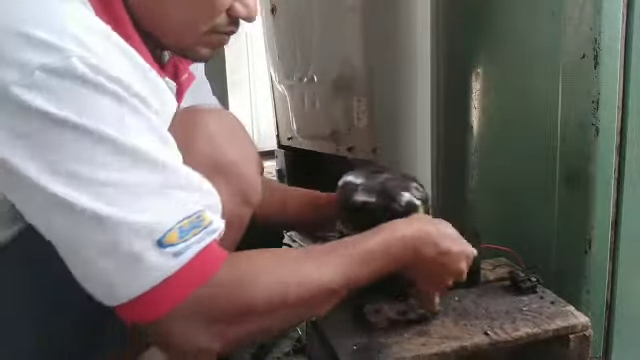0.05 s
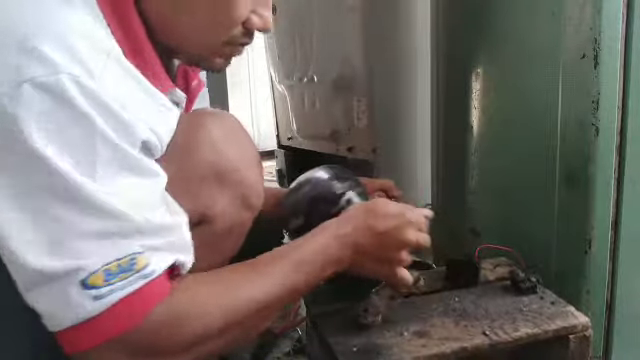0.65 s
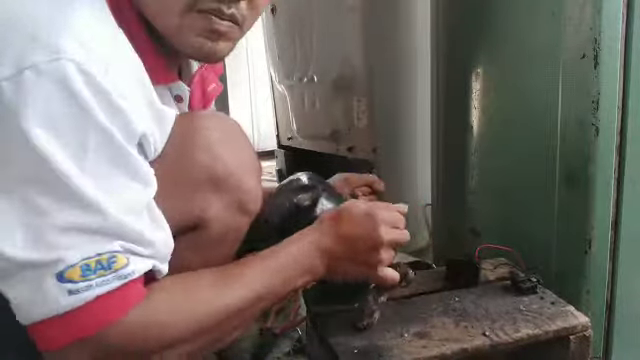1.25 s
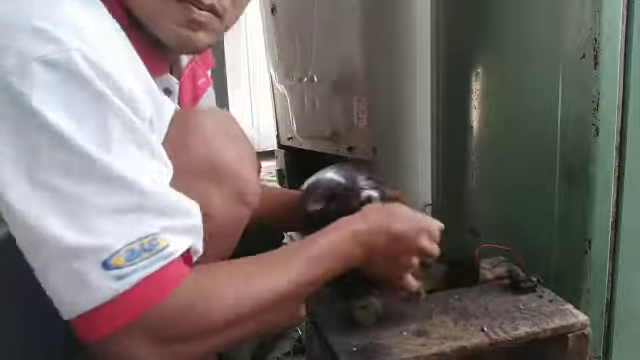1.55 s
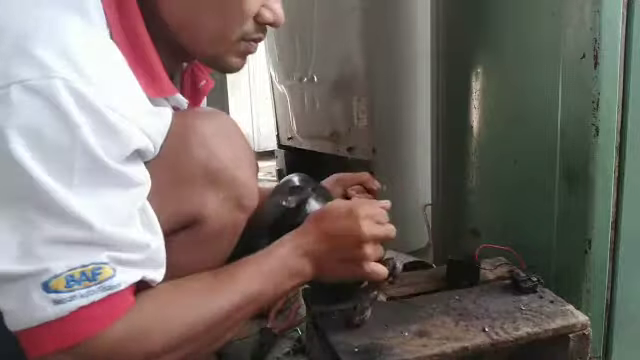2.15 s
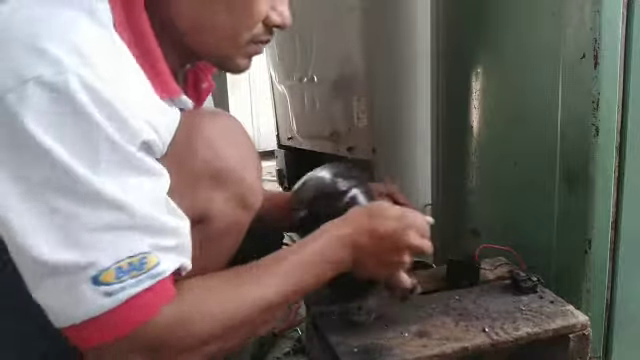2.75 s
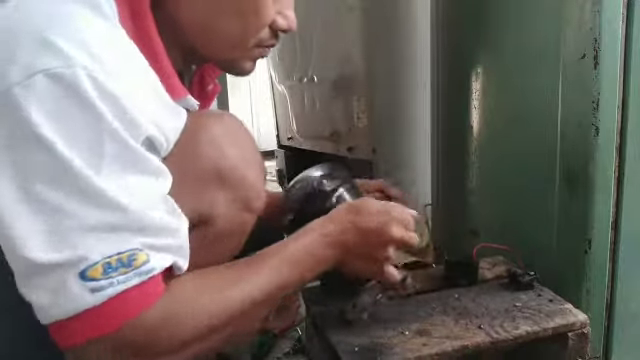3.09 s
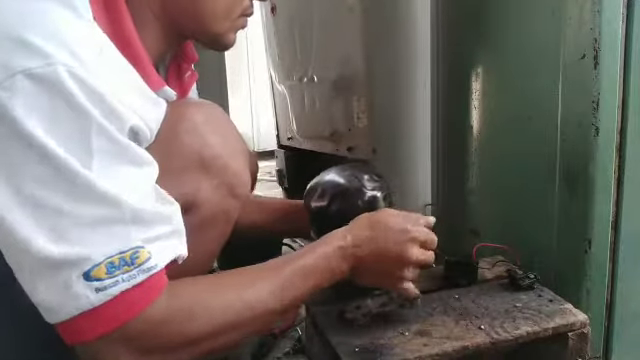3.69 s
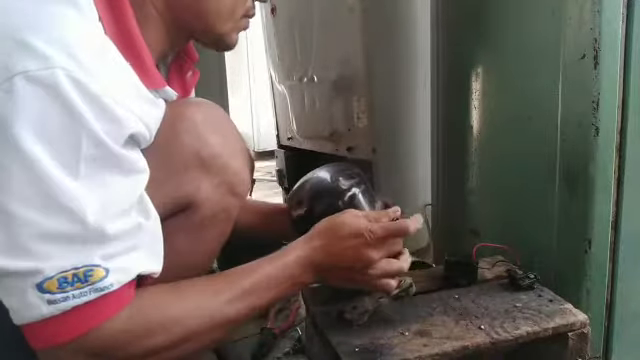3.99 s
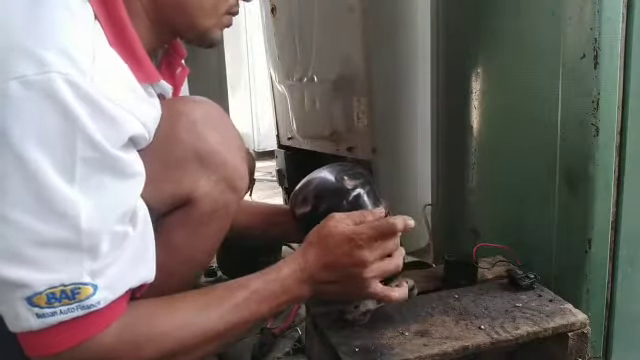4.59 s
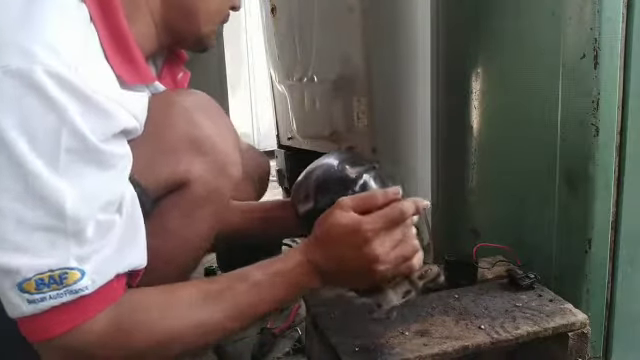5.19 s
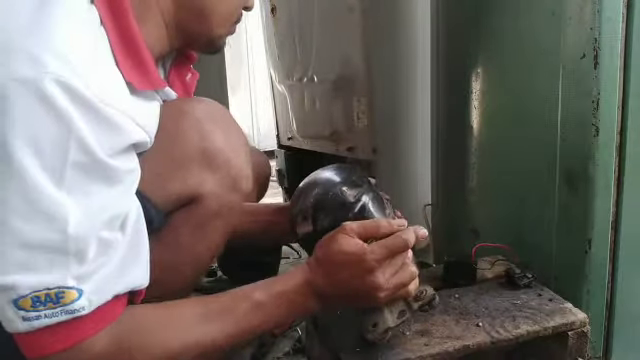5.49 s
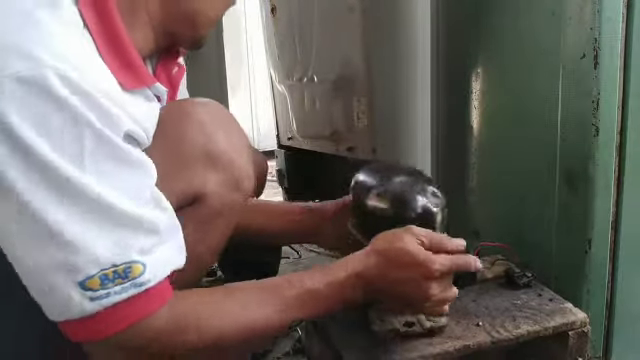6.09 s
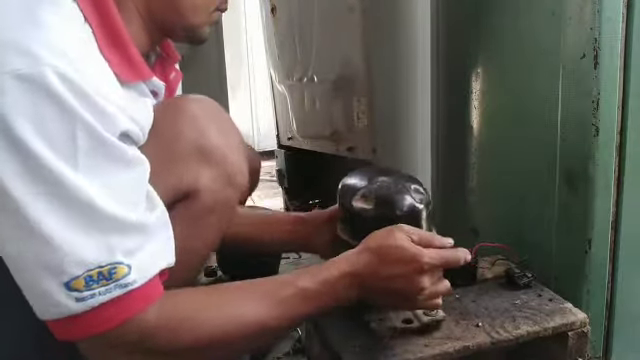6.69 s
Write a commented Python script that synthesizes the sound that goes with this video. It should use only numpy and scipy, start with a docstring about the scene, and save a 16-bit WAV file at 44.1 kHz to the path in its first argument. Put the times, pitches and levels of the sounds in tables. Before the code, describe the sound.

A sealed fridge compressor is shaken by hand over a wooden bench in a small workshop. The motor inside slams against the steel shell in quick, hard knocks with a brief rattling ring, and the base sometimes bumps the wood. Midway the knocking stops and oil sloshes softly inside, then the clanking resumes. The microphone is close, with faint room tone behind.

```python
"""Hard steel knocks, close to the microphone: a sealed fridge compressor is shaken by hand over a
wooden bench in a small workshop. At each swing the sprung motor inside slams into the shell and
chatters against it; the base bumps the bench. Midway the can is only tilted gently and the oil is
heard sloshing alone, then the shaking resumes. Faint room tone and a high whine lie behind it all."""
import sys
import numpy as np
from scipy import signal
from scipy.fft import rfft, irfft, next_fast_len
from scipy.io import wavfile

SR = 44100
rng = np.random.default_rng(int(sys.argv[2]) if len(sys.argv) > 2 else 0)


def master_out(mix):
    """Clip the mix to full scale and print it as 16-bit PCM to the path in sys.argv[1]."""
    frames = np.transpose(np.atleast_2d(mix))
    ceiling = np.clip(frames, -1, 1)
    pcm = np.round(ceiling * 32767).astype(np.int16)
    wavfile.write(sys.argv[1], SR, pcm)


N = 302085
TAIL = 16384   # samples in one ringing sound

# Levels in the tables are relative: each layer adds its own gain.
# steady air of the workshop: (frequency [Hz], density [dB])
AIR_SPECTRUM = [(30, 2), (50, 7), (75, 3), (100, 6.5), (250, -7.5), (800, -13), (2000, -19.5), (4000, -25),
                (5200, -31.5), (6400, -16), (7400, -8.5), (8200, -16.5), (9200, -28), (12500, -26.5),
                (15700, -16)]
# oil washing around in the can: (time [s], level [dB])
OIL_WASH = [(0.0, -44), (1.49, -51), (1.58, -44), (1.72, -59), (1.95, -50), (2.04, -40), (2.86, -70),
            (3.03, -43), (3.2, -45), (3.47, -54.5), (4.54, -47), (5.28, -54), (5.99, -45), (6.37, -63),
            (6.58, -70.5), (6.85, -77)]
# oil slapping the wall as the can tips: (time [s], level [dB], half length [s], spray level [dB])
OIL_SLAPS = [(0.443, -44.5, 0.098, -54.5), (2.373, -43, 0.032, -58), (2.801, -45, 0.033, -66),
             (3.594, -46.5, 0.015, -70), (3.765, -51.5, 0.022, -58), (3.935, -42.5, 0.023, -48.5),
             (4.06, -58.5, 0.073, -57.5), (4.242, -44, 0.014, -48.5), (4.294, -42.5, 0.034, -58),
             (4.398, -44.5, 0.02, -64), (4.548, -49.5, .019, -56), (4.602, -43.5, 0.0097, -49.5),
             (4.644, -44.5, 0.021, -53), (4.937, -42, 0.016, -54), (5.002, -48, 0.027, -62),
             (5.44, -43, 0.043, -63), (6.463, -42.5, 0.015, -75)]
# splashing oil: (frequency [Hz], density [dB])
SLOSH_SPECTRUM = [(250, -13.5), (450, 0.5), (600, -5.5), (780, 3), (950, -5), (1200, -3), (1550, -0.5),
                  (2000, -7), (3200, -9.5), (4500, -17), (6500, -13.5), (9000, -22.5), (13000, -29),
                  (15500, -18)]
# fine oil spray: (frequency [Hz], density [dB])
SPRAY_SPECTRUM = [(4000, -9), (7000, 9), (9500, -4), (15500, 9)]
# air space above the oil: (frequency [Hz], width [Hz], level [dB])
CAVITY_MODES = [(755, 51, 6), (1104, 13.6, -3.5), (1208, 43, 0.5), (1542, 52, -3)]
# large bubbles in the oil: (time [s], starting pitch [Hz], level [dB])
BUBBLES = [(0.135, 486, -37), (0.285, 2060, -43), (0.315, 1111, -35.5), (0.385, 784, -44.5),
           (2.315, 865, -41), (3.900, 783, -52), (4.125, 752, -49), (4.210, 755, -48)]
# boards shuddering under the heavy can: (frequency [Hz], density [dB])
BOARD_SPECTRUM = [(18, 0.5), (30, 1), (42, -2), (57, 5.5), (73, -23), (95, -6), (120, -10.5), (150, 0.5),
                  (220, -37)]
# the wooden bench: (frequency [Hz], width [Hz], level [dB])
BENCH_MODES = [(155.4, 28.7, 1), (195, 71, 0.5), (314, 107, 3.5), (454, 77, 0.5), (605, 150, -3),
               (842, 47, -3.5), (1406, 320, 8.5), (1990, 1300, 6)]
# the base landing on the bench between swings: (time [s], peak level [dB], contact sharpness [Hz])
BASE_BUMPS = [(0.302, -34, 264), (0.489, -29.5, 246), (1.602, -19, 456), (2.009, -13, 3000),
              (2.856, -24.5, 350), (2.976, -27, 220), (3.053, -20.5, 520), (5.036, -36, 257),
              (5.417, -22.5, 1180), (5.849, -29.5, 237), (6.054, -19.5, 483), (6.234, -30, 220)]
# crowded modes of the motor: (frequency [Hz], density [dB])
MOTOR_SPECTRUM = [(110, -41), (150, -2.5), (215, -5), (320, 2.5), (400, -6.5), (500, 4), (600, -0.5),
                  (780, 4.5), (930, -3), (1100, -10), (1340, -4.5), (1500, -6), (2000, -15.5),
                  (2600, -20.5)]
# crowded modes of the shell wall: (frequency [Hz], density [dB])
WALL_SPECTRUM = [(2000, -41), (2300, -12), (2500, -3.5), (2700, -1.5), (2830, 6.5), (3050, -7.5),
                 (3400, -10), (3800, -11.5), (4080, 1), (4350, -16.5), (4700, -17)]
# bright clash at the point of contact: (frequency [Hz], density [dB])
CLASH_SPECTRUM = [(4300, -59), (4900, -18.5), (5400, -6), (5950, -9), (6500, 3.5), (7400, -2.5), (8000, -5),
                  (8700, -18.5), (9350, -17), (10800, -21), (13000, -17), (13900, -12), (15700, -16)]
# the motor on its springs: (frequency [Hz], level [dB], t60 [s])
SPRING_MODES = [(695.9, -5, 0.23), (813, -1, 0.17), (957, -5, 0.16), (1126, 3, 0.15), (1253, 1, .14),
                (1350, -12, 0.38)]
# lasting modes of the steel shell: (frequency [Hz], level [dB], t60 [s])
SHELL_MODES = [(2630, -11.5, 0.066), (2750, -8.5, 0.12), (2840, -3, 0.14), (2850, -5.5, 0.16),
               (3050, -10.5, 0.16), (3250, -11.5, 0.25), (3670, -13.5, .11), (3990, -10.5, 0.093),
               (4130, -8.5, 0.072), (6420, -4.5, 0.13), (6460, -14.5, 0.11), (9300, -15.5, 0.1),
               (11450, -20, 0.15), (12600, -23, .12), (13950, -11, .12)]
# the motor hits the shell, flies back and strikes again: (time [s], level [dB], hardness [0-1],
# flight [s], second level [dB], second hardness [0-1], loss per bounce [dB])
SLAMS = [(0.036, -13, 0.89, 0.028, -16, 0.75, 3.5), (0.239, -24, 0, .011, -19.5, 0.42, 4),
         (0.505, -12.5, .85, .023, -10.5, 0.8, 8), (0.712, -18, 0.36, 0.015, -17.5, 0.46, 7.5),
         (0.97, -12.5, 0.91, 0.024, -13.5, 0.88, 3), (1.171, -16.5, 0.46, .014, -18, 0.78, 10),
         (1.427, -11.5, 0.87, 0.028, -23.5, 0.76, -0.5), (1.565, -28, 0.26, 0.02, -45, 0.1, 13),
         (1.646, -19.5, 0, 0.0089, -18, 0.61, 5.5), (1.912, -14, 0.77, 0.028, -17.5, 0.66, 3),
         (2.128, -21, 0.3, 0.015, -22.5, 0.64, 5.5), (2.4, -13.5, 0.82, 0.025, -15.5, 0.89, 4),
         (2.601, -26.5, 0.44, 0.012, -23, 0.51, 6), (2.866, -12.5, 0.94, 0.022, -15, 0.98, 3.5),
         (3.006, -19, 0.86, .014, -34, .4, 14), (3.086, -15, 1, 0.018, -21, 0.2, 8),
         (5.457, -22.5, 0.93, .033, -26, 0.3, 6.5), (5.698, -10.5, 0.87, 0.031, -19, 0.82, 4),
         (5.88, -28.5, 0.36, 0.019, -32, 0, 7), (6.016, -30.5, 0.24, 0.01, -50, 0.2, 17),
         (6.082, -14.5, 0.82, 0.03, -15.5, 0.76, 5), (6.263, -20.5, 0.22, 0.021, -26.5, 0, 9),
         (6.485, -23, 0.52, 0.026, -19, 0.86, 6), (6.817, -22, 0.97, 0.038, -34, 0.7, 5)]


def from_db(db):
    return 10 ** (np.asarray(db) / 20)


def unit_rms(x):
    return x / np.sqrt(np.mean(x ** 2, axis=-1, keepdims=True) + 1e-20)


def decay(t60):
    return from_db(-60 * np.arange(TAIL) / SR / t60)


def butter(x, hz, kind, order=2):
    return signal.sosfilt(signal.butter(order, min(hz, .45 * SR), kind, fs=SR, output="sos"), x)


def coloured(x, spectrum):
    """Gives noise a spectrum that falls away beyond its ends; rms 1."""
    size = next_fast_len(x.shape[-1])
    hz, db = np.transpose(spectrum)
    f = np.maximum(np.fft.rfftfreq(size, 1 / SR), 1)
    skirts = np.minimum(1, np.minimum(f / hz[0], hz[-1] / f)) ** 2
    gain = from_db(np.interp(np.log(f), np.log(hz), db)) * skirts
    return unit_rms(irfft(rfft(x, size) * gain, size)[..., :x.shape[-1]])


def resonate(x, modes):
    """Parallel resonances of alternating sign; a unit click starts each as a sine of its level."""
    out = 0
    for k, (hz, width, db) in enumerate(modes):
        r, w = np.exp(-np.pi * width / SR), 2 * np.pi * hz / SR
        ring = signal.lfilter([0, np.sin(w)], [1, -2 * r * np.cos(w), r * r], x + 1e-18)
        out = out + (-1) ** k * from_db(db) * ring
    return out


def place(times, sounds):
    """Lays one sound at each time."""
    out = np.zeros(N + TAIL)
    for s, sound in zip(times, sounds):
        at = int(np.clip(s * SR, 0, N))
        out[at:at + TAIL] += sound
    return out[:N]


def swells(rows):
    """Power over time of smooth bursts: (time [s], level [dB], half length [s])."""
    t = np.arange(N) / SR
    return sum(from_db(db) ** 2 * np.exp(-np.minimum(((t - s) / half) ** 2, 60))
               for s, db, half, *_ in rows)


def room_tone():
    """Steady air noise and a faint high whine, far behind the bench."""
    air = from_db(-57.5) * coloured(rng.standard_normal(N), AIR_SPECTRUM)
    whine = from_db(-75) * unit_rms(resonate(rng.standard_normal(N), [(5840, 24, 0)]))
    return air + whine


def workshop(x, wet_db, t60, wall_hz):
    """The near walls add a dull, diffuse tail to the direct sound at the microphone."""
    tail = butter(rng.standard_normal(TAIL), wall_hz, "low", order=1) * decay(t60) * (1 - decay(0.02))
    return x + from_db(wet_db) * signal.fftconvolve(x, tail / np.linalg.norm(tail))[:N]


def oil_spray(lead_s):
    """Fine spray hisses just ahead of each slap of the oil."""
    bursts = [(s - lead_s, spray_db, half) for s, _, half, spray_db in OIL_SLAPS]
    return np.sqrt(swells(bursts)) * coloured(rng.standard_normal(N), SPRAY_SPECTRUM)


def oil_slosh(surge_lag_s, surge_db, surge_half_s):
    """Oil washes, slaps and surges after each slam; its splashes ring in the air space of the can."""
    surges = [(s + surge_lag_s, db + surge_db, surge_half_s) for s, db, *_ in SLAMS]
    wash_db = np.interp(np.arange(N) / SR, *np.transpose(OIL_WASH))
    power = from_db(wash_db - 4.5) ** 2 + from_db(-3) * swells(OIL_SLAPS + surges)
    grains = (rng.random(N) < 5000 / SR) * rng.standard_normal(N)
    grains *= from_db(1.36 * np.minimum(rng.exponential(1, N), 4))   # a few stand out
    pops = (rng.random(N) < 150 / SR) * rng.standard_normal(N)
    splash = from_db(-1.5) * coloured(grains, SLOSH_SPECTRUM)
    gurgle = from_db(-5) * unit_rms(resonate(pops, CAVITY_MODES))
    return np.sqrt(power) * (splash + gurgle)


def oil_gulps(t60, sag_per_s):
    """A trapped bubble rings, and its pitch sags as the oil moves on."""
    t = np.arange(TAIL) / SR
    s, hz, db = np.transpose(BUBBLES)
    tones = np.sin(2 * np.pi * hz[:, None] * (t - sag_per_s * t ** 2 / 2))
    return place(s, from_db(db)[:, None] * tones * decay(t60) * (1 - decay(0.026)))


def board_shudders(levels_db):
    """The boards swing slowly under each load."""
    swing = coloured(rng.standard_normal((len(levels_db), TAIL)), BOARD_SPECTRUM)
    return from_db(levels_db)[:, None] * swing * decay(0.51) * (1 - decay(0.026))


def bench_bumps(heavy_db, settle_s, settle_db, settle_hz):
    """The base lands on the boards between swings and settles on them after each heavy slam."""
    settles = [(s + settle_s, db + settle_db, settle_hz) for s, db, *_ in SLAMS if db > heavy_db]
    landings = BASE_BUMPS + settles
    thuds = []
    for _, db, sharp_hz in landings:
        push = signal.unit_impulse(TAIL) + from_db(-28) * rng.standard_normal(TAIL) * decay(0.17)
        push = butter(push, sharp_hz, "low")   # a soft landing wakes only the low modes
        push = butter(push, 0.1 * sharp_hz, "high")   # a sharp one hardly moves them
        thud = resonate(push, BENCH_MODES)
        thuds.append(from_db(db) * thud / np.abs(thud).max())
    s, db, _ = np.transpose(landings)
    return place(s, np.array(thuds) + board_shudders(db - 20.5))


def crowded_ring(count, spectrum, t60, crack_db, crack_t60, alike):
    """Crowded modes give a crack, then a tail; the share `alike` is the same at every blow."""
    common = np.sqrt(alike) * rng.standard_normal(TAIL)
    fresh = np.sqrt(1 - alike) * rng.standard_normal((count, TAIL))
    envelope = decay(t60) + from_db(crack_db) * decay(crack_t60)
    spreading = 1 - decay(0.0066)   # the blow takes a moment to spread through the steel
    return coloured(common + fresh, spectrum) * envelope * spreading ** 2


def struck_modes(count, modes, scatter_db, tilt_db, detune):
    """Each point of contact gives the modes new strengths (tilt per octave); moving oil detunes them."""
    age = np.arange(TAIL)
    tones = np.array([from_db(db) * decay(t60) * np.exp(2j * np.pi * hz * age / SR)
                      for hz, db, t60 in modes])
    octaves = np.log2(np.array(modes)[:, 0])
    size, phase = rng.uniform(-0.85, 1, (2, count, len(modes)))
    gains = from_db(scatter_db * size + tilt_db * (octaves - octaves.mean()))
    rings = ((gains * np.exp(1j * np.pi * phase)) @ tones).real * (1 - decay(0.0013))
    speeds = 1 + detune * rng.standard_normal(count)
    return np.array([np.interp(age * speed, age, ring, right=0) for speed, ring in zip(speeds, rings)])


def can_jolts(force):
    """The whole can gives a hollow knock of two or three cycles; stronger blows sound higher."""
    hz = np.interp(force, [0, 1], [834, 1081])
    width_hz = np.interp(force, [0, 1], [536, 450])
    t = np.arange(TAIL) / SR
    age = np.minimum(np.pi * width_hz * t, 50)
    return -np.sin(2 * np.pi * hz * t) * (age / 2) ** 2 * np.exp(2 - age)


def rebounds(blows, gap_s, loss_db, count=3):
    """Each blow is followed by a few weaker bounces at uneven gaps."""
    out = blows.copy()
    for row, blow, (gaps, sizes) in zip(out, blows, .5 + rng.random((len(blows), 2, count))):
        for k, lag in enumerate(np.cumsum(gap_s * gaps * SR).astype(int)):
            row[lag:] += (-1) ** k * from_db(loss_db) * sizes[k] / (k + 1) * blow[:TAIL - lag]
    return out


def motor_chatter(bounces, first_gap_s, shrink, softening):
    """Slam, second blow, then shrinking bounces: (time [s], level [dB], hardness)."""
    rows = []
    for s, db, hard, flight_s, second_db, second_hard, loss_db in SLAMS:
        rows += [(s, db, hard), (s + flight_s, second_db, second_hard)]
        gaps = first_gap_s * shrink ** np.arange(bounces) * (1 + .08 * rng.standard_normal(bounces))
        for k, lag in enumerate(np.cumsum(gaps), 1):
            rows.append((s + flight_s + lag, second_db - k * loss_db, second_hard - k * softening))
    return np.array(rows)


def motor_knocks():
    """Close up, the motor jolts the can, rings itself, sets the shell ringing and shakes the boards."""
    s, clunk_db, hard = motor_chatter(bounces=3, first_gap_s=.0155, shrink=.85, softening=0.031).T
    count = len(s)
    # hard blows ring and clash more; weak ones favour the low modes
    ring_db = clunk_db + np.interp(hard, [0, 1], [-15.5, -3.5])
    clash_db = clunk_db + np.interp(hard, [0, 1], [-28.5, -7.5])
    force = np.interp(clash_db, [-42, -25], [0, 1])[:, None]
    motor = crowded_ring(count, MOTOR_SPECTRUM, t60=0.2, crack_db=9, crack_t60=0.018, alike=0.53)
    springs = struck_modes(count, SPRING_MODES, scatter_db=0.5, tilt_db=10 * (force - 1.11), detune=.0067)
    wall = crowded_ring(count, WALL_SPECTRUM, t60=0.11, crack_db=6.5, crack_t60=0.014, alike=0.49)
    shell = struck_modes(count, SHELL_MODES, scatter_db=9.5, tilt_db=5.4 * (force - .97), detune=.0068)
    clash = crowded_ring(count, CLASH_SPECTRUM, t60=0.2, crack_db=8.5, crack_t60=0.034, alike=0.75)
    clunk = from_db(-0.38) * can_jolts(force) + from_db(-15) * motor + from_db(-20) * springs
    ring = from_db(-7.5) * wall + from_db(-12.5) * shell
    clunk_gain, ring_gain, clash_gain = from_db([clunk_db, ring_db, clash_db - 9])[:, :, None]
    blows = clunk_gain * clunk + ring_gain * ring + clash_gain * clash
    return place(s, rebounds(blows, gap_s=.011, loss_db=-14) + board_shudders(clunk_db - 22))


def widen(x, side_db, above_hz):
    """The can sits centre; a bright burst at each attack makes left and right differ."""
    treble_power = butter(x, above_hz, "high", order=4) ** 2
    fast = butter(treble_power, 150, "low", order=1)
    slow = butter(treble_power, 8, "low", order=1)
    attack = np.clip(1 - 2 * slow / (fast + 1e-12), 0, 1)
    side = from_db(side_db) * attack * np.sqrt(fast) * coloured(rng.standard_normal(N), CLASH_SPECTRUM)
    return np.array([x + side, x - side])


def scene():
    """The shaken can and its oil in front of the microphone, the workshop behind."""
    background = room_tone()
    can = motor_knocks()
    can += bench_bumps(heavy_db=-15, settle_s=.103, settle_db=-20.5, settle_hz=189)
    can += oil_gulps(t60=0.22, sag_per_s=0.56)
    can = workshop(can, wet_db=-15.5, t60=0.27, wall_hz=4020)
    can = widen(can, side_db=-4, above_hz=6000)
    oil = oil_slosh(surge_lag_s=0.057, surge_db=-32, surge_half_s=0.051) + oil_spray(lead_s=0.01)
    return background + oil + can


def record(dry):
    """The microphone chain cuts the top steeply."""
    cutoff_hz = 15800
    return signal.sosfilt(signal.ellip(10, .2, 80, cutoff_hz, fs=SR, output="sos"), dry)


dry = scene()
out = record(dry)
master_out(out)
```